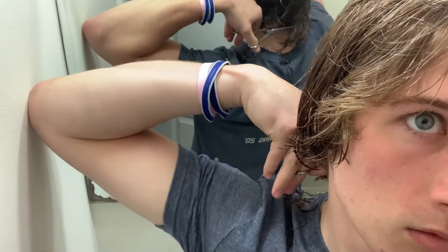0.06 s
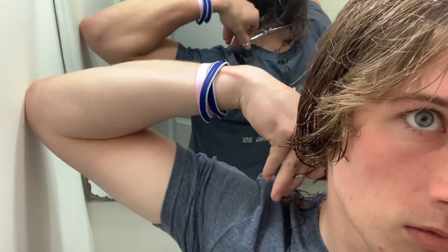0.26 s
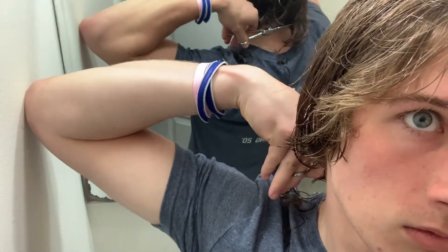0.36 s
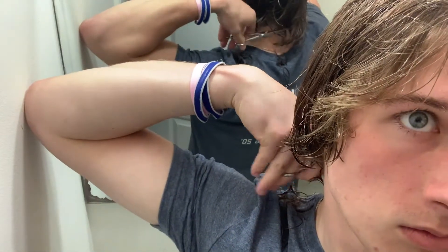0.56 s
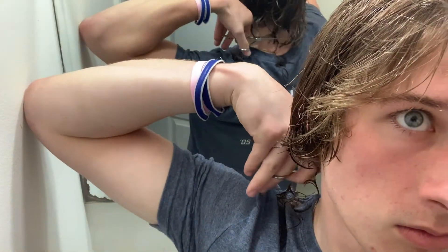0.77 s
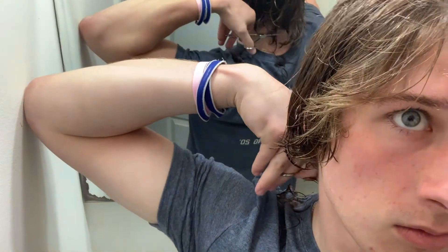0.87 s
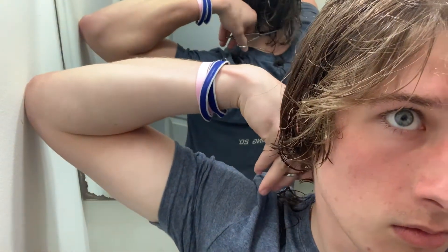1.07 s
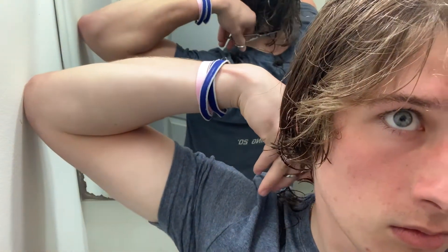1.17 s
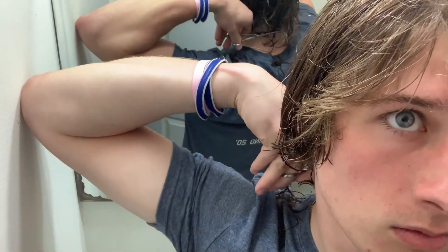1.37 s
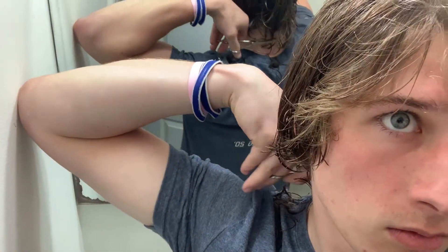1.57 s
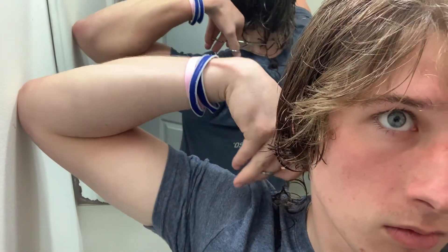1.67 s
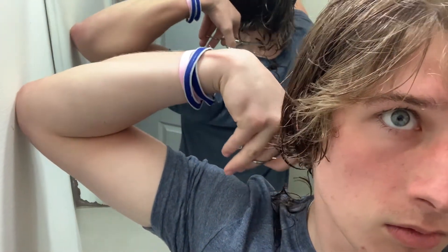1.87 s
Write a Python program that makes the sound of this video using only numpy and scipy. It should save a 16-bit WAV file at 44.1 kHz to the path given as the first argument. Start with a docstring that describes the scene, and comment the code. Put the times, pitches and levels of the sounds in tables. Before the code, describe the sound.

Two crisp scissor cuts through hair, with a soft sleeve rustle between them.

```python
"""Two scissor cuts through hair

Close up, in a small hard-walled room where a fan hums, hair rustles between steel blades.
Each cut is a short crunch that ends in the ringing clack of the shanks meeting, and the pivot
scrapes softly as the blades part. Between the cuts an arm shifts with a dull rustle of cloth."""
import sys
import numpy as np
from scipy import signal
from scipy.fft import rfft, irfft, next_fast_len
from scipy.io import wavfile
from scipy.ndimage import map_coordinates

SR = 44100
rng = np.random.default_rng(int(sys.argv[2]) if len(sys.argv) > 2 else 0)


def int16_out(signal):
    """Quantize to a 16-bit WAV file."""
    q = np.round(np.clip(np.atleast_2d(signal).T, -1, 1) * 32767)
    wavfile.write(sys.argv[1], SR, q.astype(np.int16))


N = 83790

# cut cues: t/s, base level/dB, gap to the second contact/s, its relative level/dB, crunch rise/s
CUTS = [(0.4709, -18.5, .0018, 4, 0.0055), (1.3881, -17.5, 0.0012, 1, 0.0067)]
# tone of the shanks' bright crack: f/Hz, level/dB
CRACK_EQ = [(300, -22), (750, -21), (1150, -11), (1550, -13), (2000, -11), (2450, 0), (3200, -1),
            (3850, -12), (4600, -6), (5400, -2), (6800, -5), (8300, 8), (9600, 0), (11000, 2.5), (12600, 2),
            (14100, 8.5), (15600, -6), (16800, -15)]
# tone of hairs being severed: f/Hz, level/dB
CRUNCH_EQ = [(500, -15), (1600, -10), (2330, 5), (2750, -3), (3300, 4), (4400, -4), (5350, 7), (6800, -3),
             (8000, 0), (10000, -9), (12500, -2), (14500, -2), (16000, -15)]

def snips(crunch_db=-16.5, crack_rise_s=.0001, crack_t60_s=.015):
    """The blades crunch through the lock, then the shanks meet in a quick double hit: a dry crack."""
    out = np.zeros((2, N))
    contact = lambda t: (1 - np.exp(-t / crack_rise_s)) * amp(-60 * t / crack_t60_s)
    for start, db, gap, second_db, crunch_rise in CUTS:
        t = clock() - start
        first_hit = contact(np.maximum(t, 0))
        second_hit = amp(second_db) * contact(np.maximum(t - gap, 0))
        crack = np.hypot(first_hit, second_hit) * rng.choice([-1, 1], (2, N))
        crunch = amp(crunch_db) * np.exp(np.minimum(t / crunch_rise, -t / gap)) * grains()
        out += amp(db) * (coloured(crack, CRACK_EQ) + coloured(crunch, CRUNCH_EQ))
    return out


# modes of the steel: f/Hz, level in cut one/dB, level in cut two/dB, side over mid/dB
STEEL_MODES = [(1130, -18, -18, -5), (2170, -13, -17, -3), (2355, -5, -6, -4), (2680, -17, -18, 10),
               (3020, -10, -14, -3), (3260, -3, -7, -6), (3450, -5, -17, -3), (4450, -14, -16, 0),
               (5230, -20, -10, -3), (5650, -16, -15, -2), (6650, -21, -14, -2), (8280, -9, -11, 0),
               (10720, -14, -12, 0), (11450, -12, -15, 0), (13480, -1, -9, 0), (13950, -3, -5, 0),
               (14130, -9, 0, 0), (14680, 1, -18, 0), (15250, -12, -2, 0)]

def steel_ring(boost_db=4, rise_s=.0002, t60_s=.016):
    """Each closure strikes all modes together; the fingers damp them quickly. Gives mid and side."""
    out = np.zeros((2, N))
    for cut, (start, db, *_) in enumerate(CUTS):
        age = np.maximum(clock() - start, 0)
        phase = 2 * np.pi * rng.random() + np.array([[0], [np.pi / 2]])  # side in quadrature
        envelope = amp(db + boost_db - 60 * age / t60_s) * (1 - np.exp(-age / rise_s))
        for hz, *cut_db, side_db in STEEL_MODES:
            gain = amp(cut_db[cut]) * amp([[0], [side_db]])
            out += gain * envelope * np.sin(2 * np.pi * hz * age + phase)
    return out


# hair sliding over the blades: peak t/s, level/dB, rise/s, decay/s, rasp f/Hz, relative rasp level/dB
HAIR_STROKES = [(.200, -52, 0.0079, 0.0098, 12800, -1), (.235, -59.5, 0.043, 0.095, 4710, -10),
                (.31, -58.5, 0.017, 0.024, 13200, -5), (.342, -52.5, 0.01, 0.017, 6540, -8),
                (.368, -54.5, 0.0084, 0.037, 4770, -11.5), (.413, -54, 0.012, 0.019, 4790, -11),
                (1.168, -69.5, 0.065, 0.033, 5310, -2.5), (1.218, -58.5, 0.013, 0.013, 12040, -5.5)]
# tone of the sliding hair: f/Hz, level/dB
HAIR_EQ = [(1500, -11.5), (2800, -5), (4200, -10.5), (5500, -8), (7000, 1), (9500, -8.5), (11200, -5),
           (12400, -3.5), (13500, -9), (14900, -2.5), (16000, -28.5)]

def hair_rustle():
    """Hair slides over the steel ahead of each cut."""
    return friction(HAIR_STROKES, HAIR_EQ)


# pivot scrapes: peak t/s, level/dB, rise/s, decay/s, rasp f/Hz, relative rasp level/dB
PIVOT_STROKES = [(.62, -57, 0.12, 0.019, 7840, -22), (.650, -53, 0.0045, 0.019, 6870, -8),
                 (1.555, -63, 0.089, 0.023, 8060, -17.5), (1.588, -56, 0.0094, 0.017, 6580, -2)]
# tone of the pivot: f/Hz, level/dB
PIVOT_EQ = [(1500, 1.5), (3000, -0.5), (5600, -3), (6700, -3.5), (8000, -1), (9500, -10), (12000, -6),
            (14200, -7), (16000, -18.5)]

def pivot_scrape():
    """The pivot rubs softly as the blades part."""
    return friction(PIVOT_STROKES, PIVOT_EQ)


def friction(strokes, eq, rasp_q=36, surge_db=3, surges_per_s=80):
    """Each stroke is grainy, surging friction that also stirs one narrow resonance of the blades."""
    out = np.zeros((2, N))
    for peak_s, db, rise, decay, rasp_hz, rasp_db in strokes:
        rasp = lambda hz: unit(1 / (1 + (rasp_q * (hz / rasp_hz - 1)) ** 2))
        tone = lambda hz: np.hypot(unit(amp(along(eq, hz))), amp(rasp_db) * rasp(hz))
        rub = grains() * swell(peak_s, db, rise, decay)
        surges = amp(surge_db * wobble(surges_per_s))  # the blades catch and slip
        out += filtered(rub * surges, tone)
    return out


def grains(slips_per_s=2100, slip_share=.25):
    """Tiny slips over a smooth hiss: two white textures of rms 1."""
    slips = (rng.random(N) < slips_per_s / SR) * rng.standard_normal((2, N))
    hiss = rng.standard_normal((2, N))
    return np.sqrt(slip_share) * unit(slips) + np.sqrt(1 - slip_share) * hiss


# stereo width of the scissors: f/Hz, side over mid/dB
SCISSORS_WIDTH = [(800, 3), (2300, 3), (3300, -2), (4500, -2), (6500, 1), (7600, 8.5), (8500, 30.5),
                  (9300, 34), (10000, -4), (11800, -6), (13200, -31.5), (14000, -5), (15000, 4.5)]

def scissors(ring_send_db=-7):
    """Cuts, hair and pivot feed the room in full; the ring of the steel stays drier."""
    noises = snips() + hair_rustle() + pivot_scrape()
    ring = steel_ring()
    reverb = room(noises + amp(ring_send_db) * ring)
    return spread(noises + ring + reverb, SCISSORS_WIDTH)


# reverb time of the room: f/Hz, T60/s
ROOM_DECAY = [(300, .3), (3000, .24), (6000, .28), (11000, .23), (15000, .2)]
# reverb return: f/Hz, level over the send/dB
ROOM_EQ = [(500, 0), (1700, -3), (2700, 0), (3500, -3), (6000, -1), (11000, -3), (15000, -1)]

def room(send, build_s=.0008):
    """The short bright tail that the hard walls give back."""
    hz, t, bands = signal.stft(rng.standard_normal((2, SR // 2)), SR, nperseg=256)
    fade = amp(-60 * t / along(ROOM_DECAY, hz)[:, None]) * (1 - np.exp(-t / build_s))
    band_energy = np.mean(fade ** 2, axis=1, keepdims=True) * SR / 2
    fade *= amp(along(ROOM_EQ, hz))[:, None] / np.sqrt(band_energy)
    tail = signal.istft(bands * fade, SR, nperseg=256)[1]
    return signal.fftconvolve(send, tail, axes=1)[:, :N]


# fader curve of the sleeve: t/s, level/dB
SLEEVE_FADER = [(0.879, -68), (0.919, -42.5), (.955, -43), (1.04, -45.5), (1.109, -52), (1.2, -53.5),
                (1.32, -85)]
# dull tone of cloth: f/Hz, level/dB
CLOTH_EQ = [(150, -6), (300, -5.5), (550, 4.5), (800, 0.5), (1200, 1), (1600, -8.5), (2300, -9),
            (3200, -17), (5500, -21.5), (8000, -42), (15000, -46)]
# tone of the arm's low push: f/Hz, level/dB
PUSH_EQ = [(30, -27.5), (55, -19), (72, 16), (95, -15.5), (200, -49.5), (600, -86)]
# stereo width of the arm and of the fan's air: f/Hz, side over mid/dB
BACKGROUND_WIDTH = [(60, -16.5), (150, -7), (280, -11), (450, 4), (950, 0.5), (2400, 0), (6000, 1),
                    (12000, 0)]

def arm(rough_db=1):
    """The sleeve rustles and the moving arm gives a low push."""
    level_db = np.interp(clock(), *np.transpose(SLEEVE_FADER), left=-120, right=-120)
    cloth = amp(level_db + rough_db * wobble(40.3)) * noise(CLOTH_EQ)
    push = swell(peak_s=.955, db=-43, rise_s=.045, decay_s=.04) * noise(PUSH_EQ)
    return spread(cloth + push, BACKGROUND_WIDTH)


# steady hum lines: f/Hz, level/dB; the fan's partials, plus a low room resonance at 72 Hz
HUM_PARTIALS = [(72, -63), (119.9, -42.5), (239.8, -54.5), (301, -61.5), (343, -64.5), (431, -65)]
# tone of the rushing air: f/Hz, level/dB
AIR_EQ = [(25, -21.5), (48, -16), (65, 2), (90, 1.5), (140, -1.5), (190, -11), (320, -6.5), (430, -9),
          (520, -17), (730, -13), (860, -8.5), (1050, -13), (1350, -24.5), (1650, -24.5), (2300, -27.5),
          (3200, -33.5), (4500, -36.5), (6500, -46.5), (10000, -61.5), (14200, -49), (16000, -71.5)]

def fan(waver_db=.7, drift_rad=.05, lean_left_db=.55, air_db=-46):
    """A mains hum that wavers a little, over a bed of rushing air."""
    hum = np.zeros(N)
    for hz, db in HUM_PARTIALS:
        peak = np.sqrt(2) * amp(db + waver_db * wobble(9))
        phase = 2 * np.pi * (hz * clock() + rng.random()) + drift_rad * wobble(24)
        hum += peak * np.sin(phase)
    pan = amp([[lean_left_db], [-lean_left_db]])
    return hum * pan + amp(air_db) * spread(noise(AIR_EQ), BACKGROUND_WIDTH)


def amp(db):
    """Decibels to gain."""
    return 10 ** (np.asarray(db) / 20)


def unit(x):
    """Scaled to rms 1."""
    return x / np.sqrt(np.mean(x ** 2) + 1e-20)


def along(points, hz):
    """A curve of (f/Hz, value) points, read at hz on a log axis."""
    knots_hz, values = np.transpose(points)
    return np.interp(np.log(hz + 1), np.log(knots_hz + 1), values)


def clock():
    """The time of every sample in seconds."""
    return np.arange(N) / SR


def wobble(knots_per_s):
    """A smooth random modulator."""
    knots = rng.standard_normal(int(N * knots_per_s / SR) + 4)
    return map_coordinates(knots, [clock() * knots_per_s], mode="nearest")


def swell(peak_s, db, rise_s, decay_s):
    """An envelope that swells to its peak and dies away."""
    t = clock() - peak_s
    return amp(db) * np.exp(np.where(t < 0, -(t / rise_s) ** 2, -t / decay_s))


def filtered(x, gain):
    """x through a minimum-phase EQ with the given gain over frequency."""
    size = 2 * next_fast_len(N)
    hz = np.fft.rfftfreq(size, 1 / SR)
    cepstrum = irfft(np.log(np.maximum(gain(hz), 1e-6)), size)
    cepstrum[1:size // 2] *= 2  # folded onto positive time: no pre-ring
    cepstrum[size // 2 + 1:] = 0
    return irfft(rfft(x, size) * np.exp(rfft(cepstrum)), size)[..., :N]


def coloured(x, eq):
    """White sound shaped by an EQ curve at the same power."""
    return filtered(x, lambda hz: unit(amp(along(eq, hz))))


def noise(eq):
    """Two unrelated coloured noises of rms 1."""
    return unit(coloured(rng.standard_normal((2, N)), eq))


def spread(pair, width):
    """Two signals as mid and side, balanced by frequency; gives left and right."""
    angle = lambda hz: np.arctan(amp(along(width, hz)))
    mid = filtered(pair[0], lambda hz: np.cos(angle(hz)))
    side = filtered(pair[1], lambda hz: np.sin(angle(hz)))
    return np.array([mid + side, mid - side])


def scene():
    """The mix: scissors up front, arm and fan behind."""
    return scissors() + arm() + fan()


def record(dry, cutoff_hz=16250, edge_hz=70):
    """A steep high cut on the whole mix."""
    size = 2 * next_fast_len(N)
    hz = np.fft.rfftfreq(size, 1 / SR)
    high_cut = 1 / (1 + np.exp((hz - cutoff_hz) / edge_hz))
    return irfft(rfft(dry, size) * high_cut, size)[:, :N]


dry = scene()
out = record(dry)
int16_out(out)
```